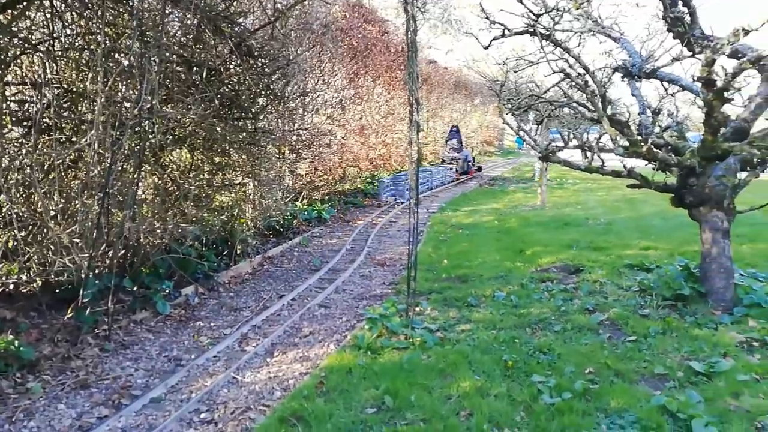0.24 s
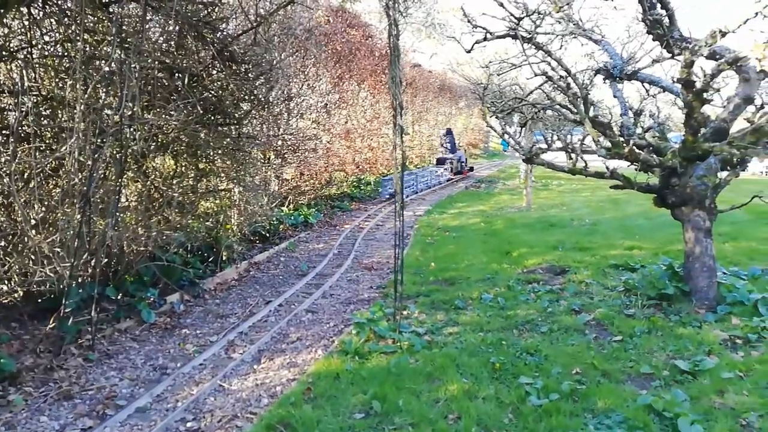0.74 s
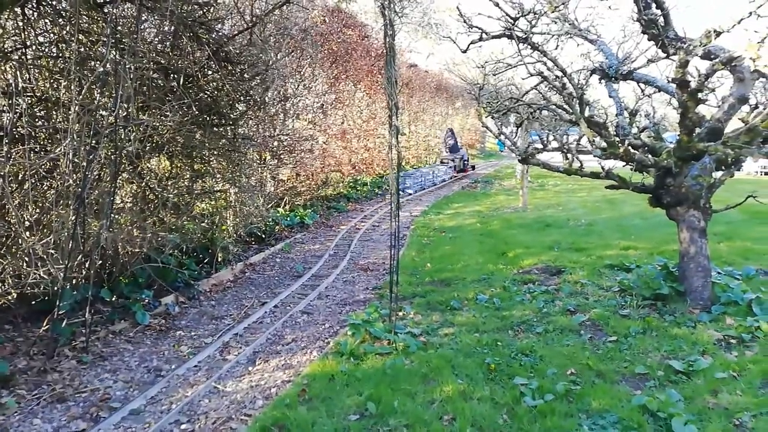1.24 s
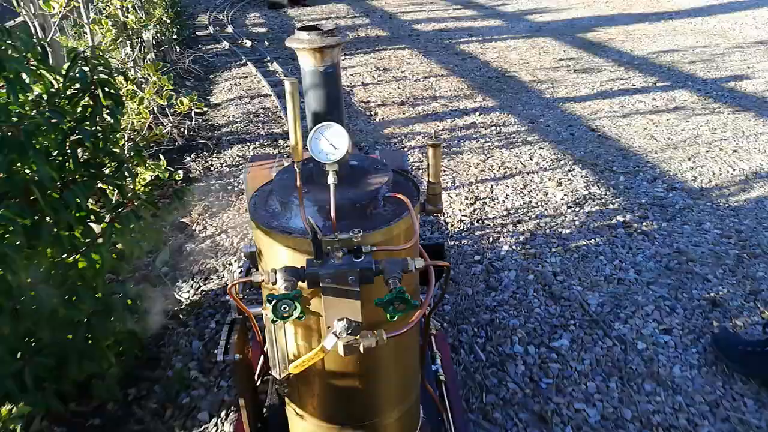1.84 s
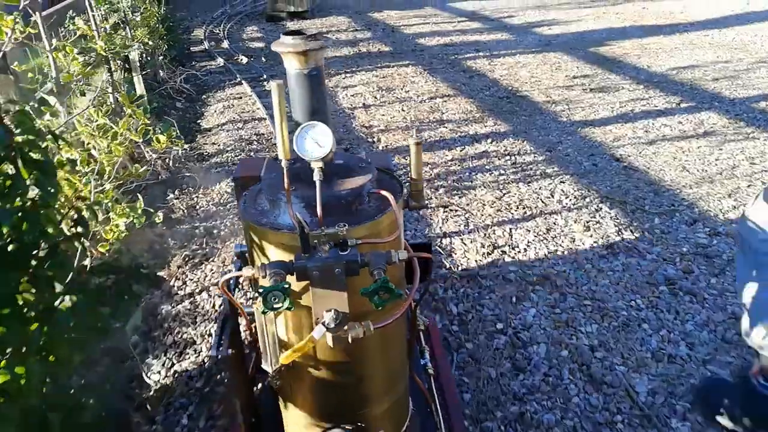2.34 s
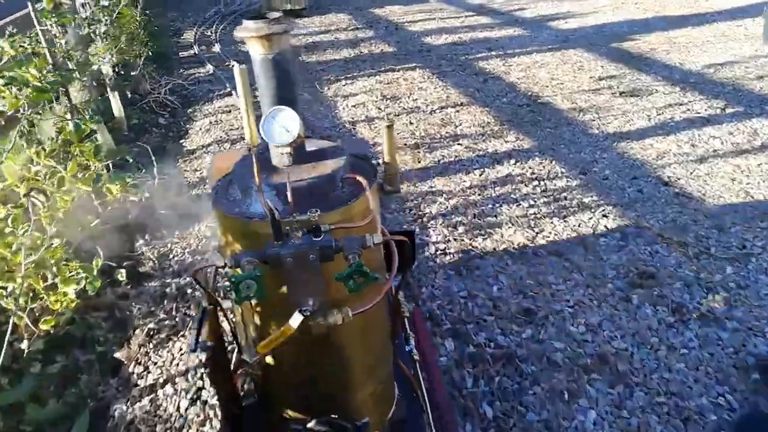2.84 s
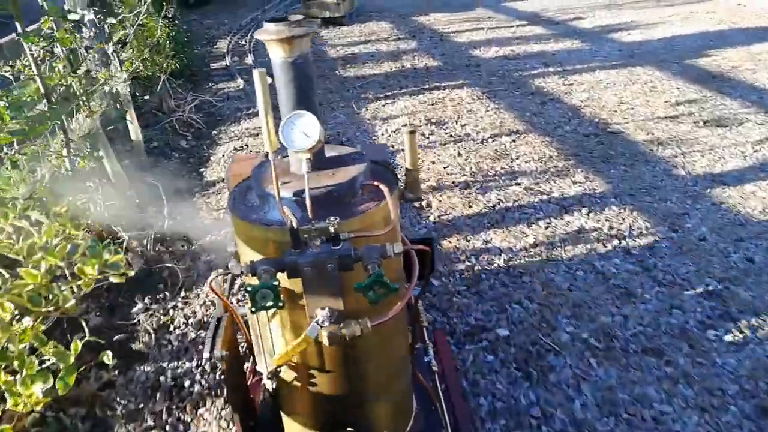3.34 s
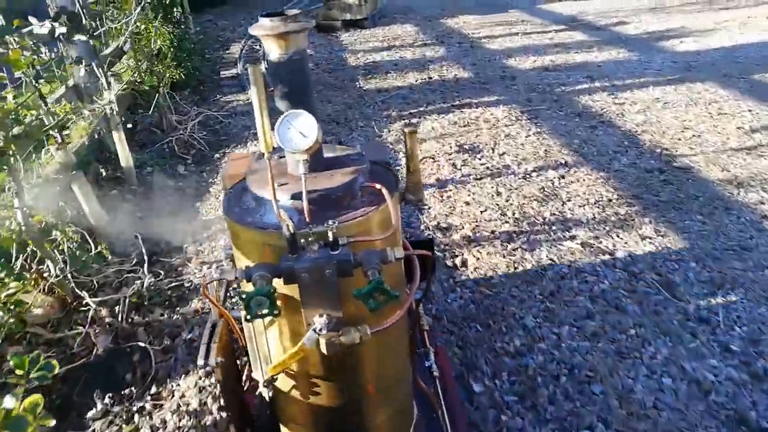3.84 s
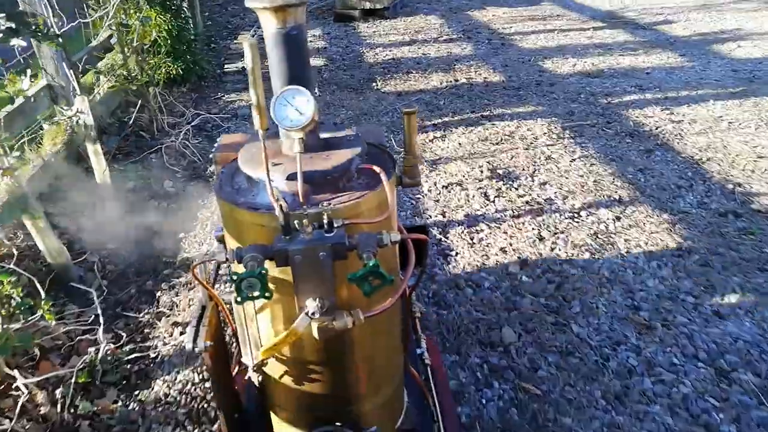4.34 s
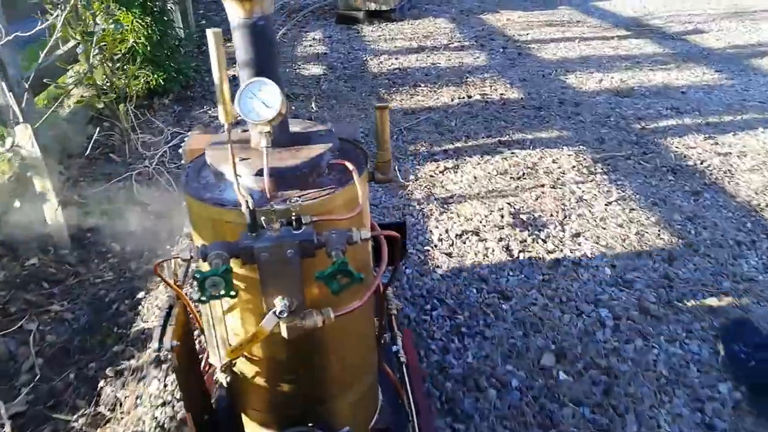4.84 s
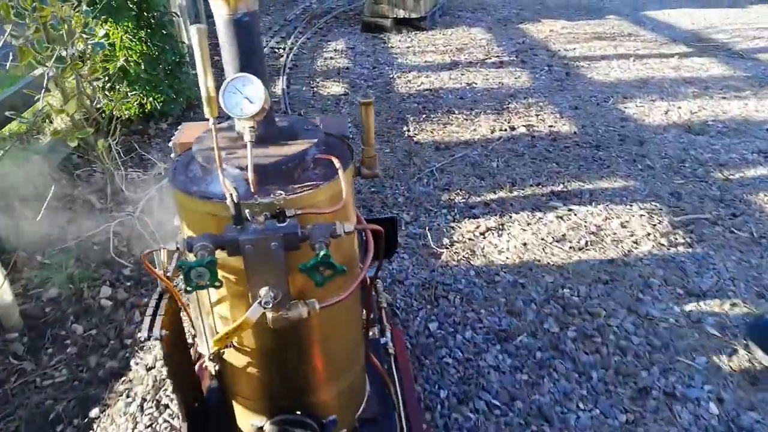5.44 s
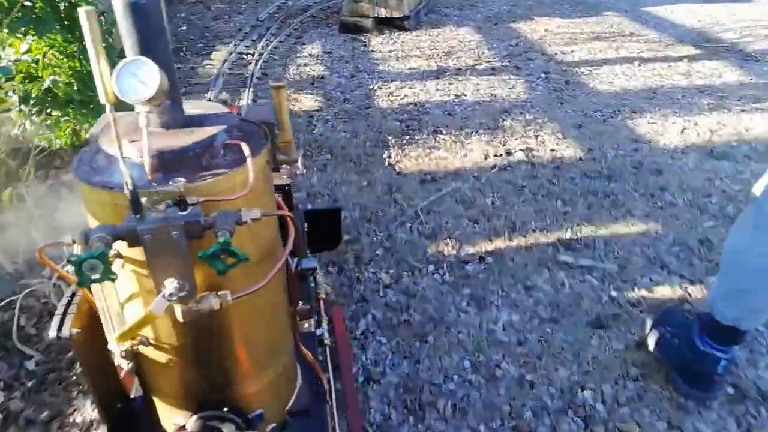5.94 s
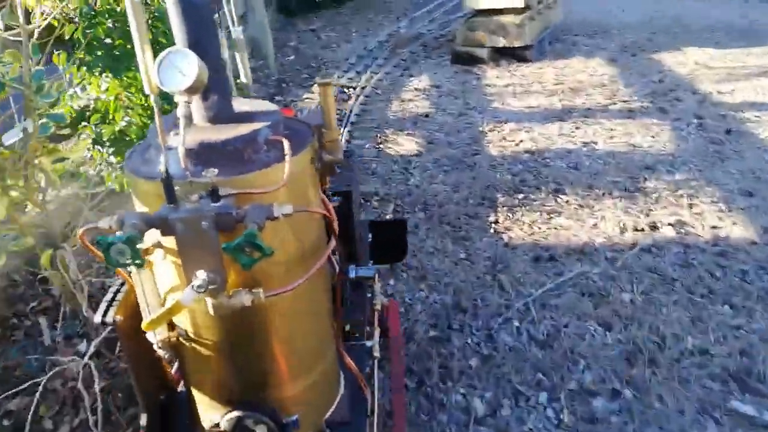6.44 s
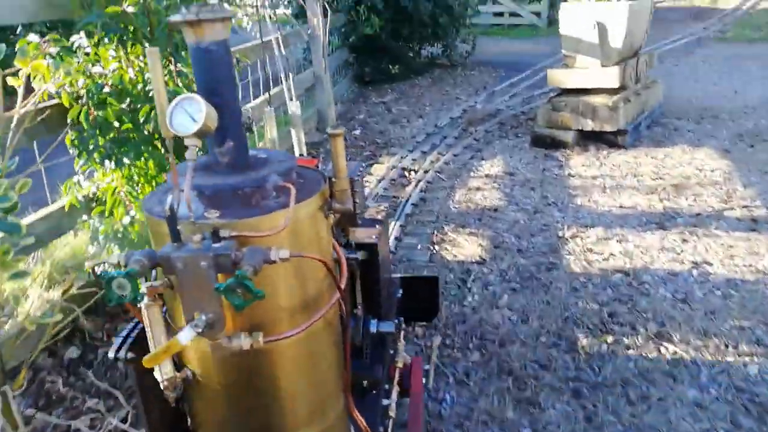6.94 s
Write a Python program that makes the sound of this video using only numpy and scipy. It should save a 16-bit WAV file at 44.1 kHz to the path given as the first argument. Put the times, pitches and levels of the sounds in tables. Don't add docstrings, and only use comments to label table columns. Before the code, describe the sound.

A garden railway engine on a hand-held phone. First its far-off exhaust is a rapid, thin flutter of steam with one faint water tick near the end. After a short complete silence, the close view bursts in with strong spitting chuffs, bright hissing tails, hollow pipe tones, burner rumble and wind buffets. The puffs keep a steady uneven pace, softening slightly as the phone turns and the treble shifts between sides.

```python
import sys
import numpy as np
from scipy import signal
from scipy.fft import rfft, irfft, next_fast_len
from scipy.io import wavfile
from scipy.ndimage import uniform_filter1d, map_coordinates

SR = 44100
rng = np.random.default_rng(int(sys.argv[2]) if len(sys.argv) > 2 else 0)


def elevation(decibels):
    levels = np.asarray(decibels, float)
    return 10 ** (levels / 20)


def dump(signal):
    limited = np.clip(np.atleast_2d(signal).T, -1, 1)
    pcm = np.round(limited * 32767).astype(np.int16)
    wavfile.write(sys.argv[1], SR, pcm)


N = 316197

# (time [s], peak [dB])
FAR_BEATS = [(0.0094, -17), (0.068, -21.6), (0.1297, -21.5), (0.2094, -22), (0.2877, -22), (0.343, -21.3),
             (0.3994, -20.4), (0.4908, -19), (0.5694, -23.3), (0.63, -27), (0.6893, -21.3), (0.7746, -20.5),
             (0.853, -22.5), (0.918, -22), (0.9794, -23), (1.063, -23.5), (1.1413, -22), (1.2, -24.4),
             (1.2694, -21), (1.3564, -21), (1.4371, -21.5), (1.497, -23.5), (1.5594, -20.7)]
# (time [s], peak [dB])
NEAR_BEATS = [(2.1811, -3), (2.3846, -6.4), (2.653, -6.5), (2.8647, -5.2), (3.1427, -6.8),
              (3.355, -5.9), (3.6395, -4.9), (3.8501, -4.5), (4.1322, -7.5), (4.352, -7.5),
              (4.6353, -9), (4.8578, -7.2), (5.1427, -9), (5.3676, -7), (5.6522, -7.8), (5.8782, -7.5),
              (6.1671, -9.5), (6.3935, -9.5), (6.6809, -10.5), (6.907, -8.5),
              (2.0893, -10), (2.2772, -4.5), (2.5265, -4.5), (2.7514, -8), (3.001, -6), (3.2384, -7.5),
                   (3.5, -5.5), (3.7324, -5.5), (3.9935, -5.5), (4.2328, -8), (4.497, -5.5), (4.7388, -8),
                   (5.004, -6.5), (5.2488, -9.8), (5.5112, -9), (5.7528, -7), (6.0248, -8.5), (6.2698, -10),
                   (6.5424, -8.5), (6.7874, -13.3), (7.0563, -9)]
# (chimney [dB], tail at first beat [dB], tail slope [dB/s])
FAR_STROKES = [
    (-17, -23.5, -35),
    (-17, -23.5, -36),
    (-16.5, -24.5, -57.5),
    (-16.5, -24, -48),
]
NEAR_STROKES = [
    (-1.1, -15.5, -42.5),
    (-1.63, -10.5, -45),
    (-0.84, -12, -44),
    (-1.8, -9, -59.5),
]
FAR_BLEED_DB = [4.5, 2.1, 2.5, 1.5, 3.0, 1.5, 3, 2, 2, -0.8, 1, 1, 2.5, 0.3, 2, 0.5, 1, 1.8, 4, 3, 1.7, 0.8,
                3]
NEAR_BLEED_DB = [2.3, -2, 1.2, 0.6, 0, -1.4, 0.7, -0.1, 0.8, -0.7, 0.1, -0.5, 1, 0.5, 0.9, -1.3, -0.9, 1.6,
                 0, -2, 0.5, 1.2, -2.0, -0.1, -0.5, 0.3, -1, -1.1, -1.8, -1.2, -0.7, -0.8, -0.1, -0.6, -2,
                 -1.7, 0, -1.3, 0.5, -1.6, -1.5]
# (centre [Hz], width [Hz], level over jet [dB])
FAR_PIPE = [(969, 110, -4), (2003, 270, 4), (3210, 510, 11.5)]
NEAR_PIPE = [(888.8, 28.4, 7.7), (1934, 207, 4.1), (2757, 190, 3.1), (3720, 270, 1.3)]
# (frequency [Hz], density [dB/Hz])
FAR_L = [(420, -6.5), (560, -11), (1080, 1.5), (1250, 6), (3370, -12), (4030, -7), (4470, -0.5), (8650, 5),
         (9530, -4), (11070, -25), (11510, -17), (14370, -16.5), (14810, -35), (15690, -50)]
FAR_R = [(420, -5.5), (560, -4.5), (1010, 7), (1160, 6.5), (4250, -1.5), (4690, 1), (4910, 6), (6890, 3.5),
         (10190, 3.5), (10850, -7.5), (11290, -9.5), (13930, -13.5), (14810, -39), (15690, -49)]
BESIDE_L = [(420, -11), (560, -4), (750, 5), (1010, 8.0), (1800, 0), (2080, -11.5), (3000, 4), (3590, 0),
            (9090, 18.5), (9530, 17), (10190, 1), (11070, -7.5), (15600, -6.5), (16100, -30)]
BESIDE_R = [(420, -5), (560, -8), (650, 5.5), (1080, 8), (1350, 12), (1940, 8), (2790, -3), (3150, 2),
            (4690, 8), (9750, 6.5), (10190, 11), (14590, -9.5), (15600, -9), (16100, -30)]
TURNED_L = [(420, -2.5), (560, 4.5), (700, 7.5), (810, 10.5), (3150, 5.5), (3370, 7), (4910, 4), (5130, -1),
            (5350, 8), (6450, 6.5), (8210, 9), (9750, 10), (12610, 0.5), (15900, -16)]
TURNED_R = [(420, -0.5), (940, -0.5), (1080, 13), (2240, -1), (3370, -1), (3590, -0.5), (5790, 8),
            (6450, -1.5), (7330, 7.5), (9750, 8), (9970, 17), (10410, 2), (15600, -13.5), (16100, -35)]
# (centre [Hz], width [Hz], depth [0-1])
NOTCHES = [
    [(2620, 500, .5), (2360, 570, 0.7)],
    [(3910, 810, 0.9), (5350, 1070, 0.83)],
    [(4530, 360, 0.8), (2230, 320, 0.95)],
]
# (centre [Hz], spread [Hz], level [dB])
FAR_BODY = [
    [(3100, 1100, 2.5), (5670, 200, 5.5), (7000, 560, -1.5), (9200, 350, 4), (10600, 500, 6.5), (12230, 300, -6.5), (14810, 200, -1.5)],
    [(3660, 220, -6), (4200, 370, -2.5), (5030, 200, -2.5), (6800, 600, -1.5), (7700, 160, -10.5), (10340, 200, -2.5), (10850, 200, 2), (11900, 300, -3.5), (14810, 200, 1.5)],
]
BESIDE_BODY = [
    [(1620, 44, -4), (4020, 150, -24), (4460, 170, -2.5), (5640, 100, 1), (7170, 330, -6.5), (8370, 300, 4), (10240, 350, 6.5), (11020, 200, 5.5), (14990, 700, 1.5)],
    [(1030, 1900, -3.5), (1520, 58, 6), (1630, 38, -4.5), (1793, 41, 3.5), (2260, 100, -2.5), (5040, 300, -2.5), (5620, 260, -14), (6500, 450, -0.5), (8150, 283, -3), (10710, 610, -17), (12230, 400, 0), (14990, 200, -1)],
]
SWING_BODY = [
    [(1400, 170, -1), (1620, 63, -3.5), (3050, 90, -8), (3400, 76, -6), (2484, 86, 8.5), (6900, 700, 5.5), (8180, 220, -14), (10800, 910, 5), (12100, 350, 3), (14470, 300, 7)],
    [(1620, 62, -2), (2280, 170, 11), (3400, 90, -6), (3010, 200, 8), (4400, 270, -2.5), (6400, 300, 3.5), (7920, 450, -7), (9500, 200, 8), (11400, 700, 3.5), (9900, 155, -1.5), (13200, 910, -6.5)],
]
AWAY_BODY = [
    [(1620, 70, -4.5), (4500, 100, -6), (1890, 120, 8.5), (3050, 250, 6.5), (4160, 220, 2.5), (5140, 300, -8), (7740, 700, 7.5), (10200, 1150, -13.5), (14990, 700, 0)],
    [(1620, 70, -5), (1880, 90, 3), (4500, 100, -6), (2960, 250, 12), (3790, 200, -6), (4900, 460, 5.5), (5960, 300, -1), (6900, 450, 4), (9130, 200, 1.5), (14130, 1100, 4)],
]
# (time [s], turned share [0-1], left lag [samples], treble left-right [dB], treble [dB])
AIM = [(0, 0, 4, -2.5, 3), (1.7, 0, 2.5, 0.5, 4.5), (2.0, 0, -3, -6.5, -1.5), (3.0, 0.23, -5, -3, 1.5),
       (4.0, 0.04, -4.5, -2.5, -1), (5.0, 0.16, -5.5, -2, 1), (5.5, 0.28, -5.5, 5, 1),
       (5.8, 0.67, -8, -1.5, 0), (6.1, 0.71, -7, -1.5, 3.5), (6.4, 0.93, -6.5, -4.5, 4.5),
       (6.7, 0.85, -8, 4.5, 1), (7.2, 0.56, -6.5, 4, 3)]
# (time [s], left delay [ms], right delay [ms])
BOUNCE = [(0, 1.5, 1.7), (2.1, 1.6, 1.697), (3.0, 1.385, 1.474), (4.0, 1.608, 1.634), (4.8, 1.7, 1.69),
          (5.4, 1.48, 1.693), (6.0, 1.54, 1.7), (7.2, 1.33, 1.61)]
# (frequency [Hz], density [dB/Hz])
FAR_ROAR = [(100, -12.5), (190, 0), (240, -4), (300, -3.5), (400, -14.5), (520, -13.5), (700, -28.5)]
NEAR_ROAR = [(100, -14.5), (140, -6.5), (178, -0.5), (205, -4), (260, -12.5), (320, -19), (450, -26.5),
             (700, -33.5)]
WIND = [(10, -20), (22, -9.5), (60, -6), (110, -5.5), (150, -14.5), (300, -66)]
# (time [s], peak [dB], spread [s])
GUSTS = [(0.1, -49.5, .1), (0.32, -46, .07), (0.6, -47, .04), (1.1, -49, .04), (2.12, -33, 0.047),
         (2.35, -47, .05), (2.53, -35.5, .04), (2.62, -46, .04), (2.82, -44, 0.08), (3.0, -42.5, .05),
         (3.32, -42.5, .05), (3.5, -48, .03), (3.63, -48, .03), (3.93, -35, 0.058), (4.06, -33.5, .05),
         (4.36, -35, 0.084), (4.2, -44, .05), (4.52, -39.5, .06), (4.8, -45, .08), (5.52, -38.5, .06),
         (6.4, -43.5, .08), (5.02, -38.5, 0.11), (5.18, -34.5, 0.064), (5.33, -30, 0.054),
         (5.71, -31, 0.052), (5.85, -36, .04), (6.0, -35, 0.044), (6.13, -30.5, 0.058),
         (6.62, -26.5, 0.067), (6.75, -31.5, 0.025), (6.88, -31.5, 0.042), (7.0, -33.5, 0.065)]
FLARES = [(2.15, -24, .034), (2.33, -29, .03), (2.51, -31, .03), (2.8, -28.5, 0.033), (3.1, -35.5, .04),
          (3.2, -32, .03), (3.36, -30, .03), (3.52, -26.5, .022), (3.61, -25, .022), (3.75, -36, .03),
          (3.95, -31.5, .03), (4.08, -31, 0.043), (4.25, -29, .04), (4.33, -27, .03), (4.5, -29, .03),
          (4.83, -26, .028), (5.05, -27.5, .06), (5.2, -30, .04), (5.33, -27, .04), (5.63, -28.5, .07),
          (5.8, -30.5, .04), (6.02, -29, .05), (6.3, -24, .04), (6.4, -28.5, .04), (6.5, -27, 0.024),
          (6.6, -32, 0.027), (6.88, -31.5, .03), (7.0, -36.5, .04)]
SONGS = [(2.13, -32, .05), (2.3, -34, .08), (2.67, -29.5, 0.021), (2.88, -27, 0.025), (3.52, -28, .025),
         (2.79, -33, 0.043), (3.1, -36.5, .04), (4.64, -31.5, 0.052), (5.17, -33.5, 0.051),
         (5.5, -33.5, .04), (5.8, -34, 0.087), (6.08, -32.5, 0.096), (6.72, -31, 0.058), (6.8, -31, 0.018)]
HIGH_SONGS = [(2.11, -33.5, .06), (4.51, -33.5, .03), (4.66, -34.5, .03), (5.4, -39, .04),
              (6.05, -37.5, .1), (6.5, -36.5, .08), (6.7, -35, 0.026)]
# (time [s], peak [dB], left-right [dB])
TICKS = [
    (1.5017, -4, 8),
]
# (time [s], peak [dB], centre [Hz], left-right [dB])
CRUNCHES = [(2.480, -14.5, 8440, 0.5), (2.486, -21, 8540, -4), (2.498, -17.5, 8800, -7),
            (2.521, -22, 6000, 4), (4.468, -22, 1990, -8), (4.70, -24.5, 2620, -7), (5.62, -25, 1660, -1),
            (5.70, -28, 1520, -5), (6.6, -35, 1880, 2)]

# (blast fall [s], leak [dB], tail sag [dB/s], chimney per blast [dB/dB])
FAR_STEAM, NEAR_STEAM = (0.09, -40, -1, 0.15), (0.0126, -27, -.9, 0.85)
# (burner [dB], wind [dB], first mode [dB], second mode [dB], sag [dB/s])
FAR_REST, NEAR_REST = (-42.5, -52.5, -42, -49.5, -1), (-33, -54, -40.5, -46.5, 0.04)
PULL = 0.057, .2, 0.58
STOP_S, CUT_S, START_S = 1.6078, 1.8, 2.0902
AWAY_S = 6.2, 6.89
SHORT_RISE_S, LONG_RISE_S, HOLD_S, EARLY = .012, .006, .013, .72
SHORT_RISE_S, LONG_RISE_S = LONG_RISE_S, SHORT_RISE_S
SPLIT_HZ, TREBLE_HZ, TOP_HZ = 1970, 6660, 15900
FAR_DB, NEAR_DB = -11.5, -14
FAR_LIKENESS, NEAR_LIKENESS = .55, .68

T = np.arange(N) / SR
FAR = T < CUT_S
SIZE = next_fast_len(N + SR // 4)
F = np.maximum(np.arange(SIZE // 2 + 1) * SR / SIZE, 1)
SIDES = np.array([[1], [-1]])


def curves(rows):
    s, *columns = np.transpose(rows)
    return [np.interp(T, s, c) for c in columns]


def shape(points):
    hz, db = np.transpose(points)
    octaves_below = np.maximum(np.log2(hz[0] / F), 0)
    return elevation(np.interp(np.log(F), np.log(hz), db) - 43 * octaves_below)


def peak(hz, width_hz):
    return 1j * F * width_hz / (hz ** 2 - F ** 2 + 1j * F * width_hz)


def colour(x, response):
    return irfft(rfft(x, SIZE) * response, SIZE)[..., :N]


def unit(x):
    return x / np.sqrt(np.mean(x ** 2))


def walk(rate_hz):
    k = max(int(SR / rate_hz), 2)
    held = np.repeat(rng.standard_normal(N // k + 1), k)
    return 0.66 * uniform_filter1d(uniform_filter1d(held, k), k)[:N]


def pair(likeness):
    common, left, right = rng.standard_normal((3, N))
    share = np.clip(likeness, 0, 1)
    return np.sqrt(share) * common + np.sqrt(1 - share) * np.array([left, right])


def swells(rows, rest_db):
    bells = sum(elevation(db) ** 2 * np.exp(-((T - s) / spread) ** 2) for s, db, spread in rows)
    return np.sqrt(elevation(rest_db) ** 2 + bells)


def pan(level_db, left_minus_right_db):
    return elevation(level_db + np.array([left_minus_right_db, -left_minus_right_db]) / 2)


def pressure(beats, strokes, fall_s, leak_db, sag_db, follow, bleed_db):
    s, peak_db = np.transpose(sorted(beats))
    pipe_db, tail_db, slope = np.transpose(strokes)[:, np.arange(len(s)) % len(strokes)]
    rise_s = np.where(np.diff(s, prepend=0) > .104, SHORT_RISE_S, LONG_RISE_S)
    start_s = s - EARLY * rise_s
    k = np.maximum(np.searchsorted(start_s, T) - 1, 0)
    age_s = np.maximum(T - start_s[k], 0)
    opening = np.minimum(age_s / rise_s[k], 1) ** 1.6
    blast = opening * np.exp(-np.maximum(age_s - HOLD_S, 0) / fall_s)
    tail_start_db = tail_db + bleed_db + sag_db * (s - s[0])
    tail = elevation(tail_start_db[k] + slope[k] * age_s)
    jet = uniform_filter1d(np.hypot(elevation(peak_db[k]) * blast, tail), size=40)
    chimney = (jet / elevation(peak_db[k])) ** 0.65 * elevation(pipe_db[k] + follow * peak_db[k])
    return jet, np.hypot(uniform_filter1d(chimney, size=180), elevation(leak_db))


def steam(lag, jet, chimney):
    noise = pair(np.where(FAR, FAR_LIKENESS, NEAR_LIKENESS))
    sputter_db = np.where(FAR, .7, 1.6) * walk(700) + np.where(FAR, .4, .5) * walk(45)
    noise = noise * elevation(sputter_db)
    noise[0] = map_coordinates(noise[0], [np.arange(N) - lag], order=2, mode="mirror")
    high = 1 / (1 + (SPLIT_HZ / F) ** 6)
    return rfft(noise * jet, SIZE) * high + rfft(noise * chimney, SIZE) * (1 - high)


def ring(pipe):
    return 1 + sum(elevation(db) * peak(hz, width) for hz, width, db in pipe)


def ports(spectrum, points, notches, body):
    response = []
    for p, (hz, width, depth), bumps in zip(points, notches, body):
        notch = 1 - np.clip(depth, 0, 1) * peak(hz, width)
        ripple_db = sum(db * np.exp(-.5 * ((F - c) / w) ** 2) for c, w, db in bumps)
        response.append(shape(p) * notch * elevation(ripple_db))
    return irfft(spectrum * np.array(response), SIZE)[:, :N]


def ground(x, db):
    i = np.arange(N)
    delays = [(ms + 0.021 * walk(2.85)) * SR / 1000 for ms in curves(BOUNCE)]
    bounced = np.array([np.interp(i - d, i, v) for d, v in zip(delays, x)])
    return (x + elevation(db) * bounced) / np.hypot(1, elevation(db))


def plume(x, far_db, near_db):
    _, s, z = signal.stft(x, SR, nperseg=512)
    field = rng.standard_normal(z.shape[1:]) + .5 * rng.standard_normal(z.shape)
    for _ in range(2):
        field = uniform_filter1d(uniform_filter1d(field, size=4, axis=1), size=9, axis=2)
    patch_db = np.where(s < CUT_S, far_db, near_db) * field / field.std()
    return signal.istft(z * elevation(patch_db), nperseg=512)[1][:, :N]


def fire(rest, since_s, chimney, roar, pipe, pan_db, second_pan_db):
    burner_db, wind_db, first_db, second_db = (db + rest[-1] * since_s for db in rest[:-1])
    flame, song, whistle = (chimney ** pull for pull in PULL)
    roar_hz = roar[np.argmax(np.array(roar)[:, 1])][0]
    burner = unit(colour(pair(0.94), shape(roar) * (1 + 0.41 * peak(roar_hz, 50))))
    burner = burner * swells(FLARES, burner_db) * flame * elevation(2.14 * walk(14))
    wind = unit(colour(pair(0.83), shape(WIND)))
    wind = wind * swells(GUSTS, wind_db) * elevation(3.5 * walk(12))
    draught = pair(0.41)
    murmur = unit(colour(draught * SIDES, peak(300, 160) ** 2)) * elevation(rest[0] - 15)
    first = unit(colour(draught, peak(pipe[0][0], 82) ** 2))
    first = first * swells(SONGS, first_db) * song * elevation(3.8 * walk(12) + pan_db * SIDES)
    second = unit(colour(draught, peak(1.03 * pipe[1][0], 300) ** 2))
    second = second * swells(HIGH_SONGS, second_db) * whistle
    second = second * elevation(4 * walk(24.95) + second_pan_db * SIDES)
    return burner + wind + murmur + first + second


def ticks():
    hits = np.zeros((2, N))
    for s, db, pan_db in TICKS:
        hits[:, int(s * SR)] = pan(db, pan_db)
    return colour(hits, elevation(8) * peak(8300, 4000) ** 3 + elevation(1.5) * peak(1800, 1200))


def crunches():
    out, age_s = np.zeros((2, N)), np.arange(1300) / SR
    envelope = age_s / 0.0027 * np.exp(-age_s / 0.0036)
    for s, db, hz, pan_db in CRUNCHES:
        band = signal.butter(2, [hz / 1.24, hz * 1.16], "band", fs=SR, output="sos")
        grit = unit(signal.sosfilt(band, rng.standard_normal(len(age_s)))) * envelope
        i = int(s * SR)
        out[:, i:i + len(age_s)] += np.outer(pan(db, pan_db), grit)
    return out


def squeak():
    time_s, hz, peak_db, spread_s = 2.569, 7100, -21, .008
    bell = np.exp(-.5 * ((T - time_s) / spread_s) ** 2)
    return elevation(peak_db) * bell * np.sin(2 * np.pi * hz * T) * elevation(np.array([[0], [-9]]))


def scene():
    turned, lag, pan_db, treble_db = curves(AIM)
    share, away = np.clip(turned, 0, 1), np.interp(T, AWAY_S, [0, 1])
    far_flow = pressure(FAR_BEATS, FAR_STROKES, *FAR_STEAM, FAR_BLEED_DB)
    near_flow = pressure(NEAR_BEATS, NEAR_STROKES, *NEAR_STEAM, NEAR_BLEED_DB)
    spectrum = steam(lag, *np.where(FAR, far_flow, near_flow))
    far = ports(spectrum * ring(FAR_PIPE), (FAR_L, FAR_R), NOTCHES[0], FAR_BODY)
    spectrum = spectrum * ring(NEAR_PIPE)
    beside = ports(spectrum, (BESIDE_L, BESIDE_R), NOTCHES[1], BESIDE_BODY)
    swing = ports(spectrum, (TURNED_L, TURNED_R), NOTCHES[2], SWING_BODY)
    last = ports(spectrum, (TURNED_L, TURNED_R), NOTCHES[2], AWAY_BODY)
    near = (1 - share) * beside + share * ((1 - away) * swing + away * last)
    hiss = np.where(FAR, elevation(FAR_DB) * far, elevation(NEAR_DB) * near)
    hiss = plume(ground(hiss, np.where(FAR, -18, -10)), 1.1, 1.8)
    treble = colour(hiss, 1 / (1 + (TREBLE_HZ / F) ** 4))
    hiss = hiss + treble * (pan(treble_db, pan_db) - 1)
    far_draw = far_flow[1] / np.median(far_flow[1][T < STOP_S])
    near_draw = near_flow[1] / np.median(near_flow[1][T > START_S])
    far_fire = fire(FAR_REST, T, far_draw, FAR_ROAR, FAR_PIPE, -0.84, -1.5)
    near_fire = fire(NEAR_REST, T - START_S, near_draw, NEAR_ROAR, NEAR_PIPE, 1.2, -4 + 8 * share)
    return hiss + np.where(FAR, far_fire, near_fire) + ticks() + crunches() + squeak()


def low_pass(x):
    return signal.sosfilt(signal.butter(12, 16030, fs=SR, output="sos"), x)


def record(dry):
    after_s = np.maximum(T - STOP_S, 0)
    remnant = np.where(after_s > 0, elevation(-16) * np.exp(-after_s / .005) * (after_s < .038), 1)
    onset = np.exp(-np.maximum(START_S - T, 0) / .0005)
    gate = np.where(FAR, remnant, onset)
    offset = -elevation(-21.0) * np.exp(-np.maximum(T - START_S, 0) / 0.049) * (T >= START_S)
    soft = colour(np.tanh(.8 * dry) / .8, 1 / np.sqrt(1 + (F / TOP_HZ) ** 120))
    return low_pass(soft * gate + offset)


dry = scene()
out = record(dry)
dump(out)
```